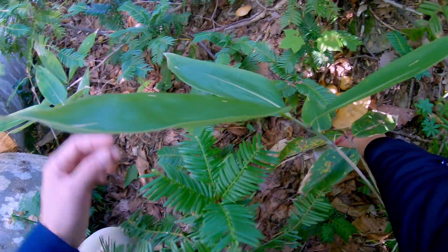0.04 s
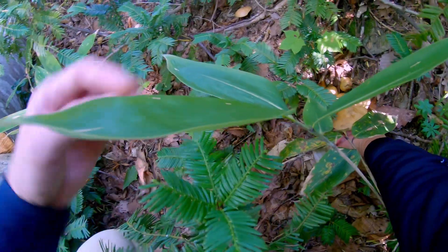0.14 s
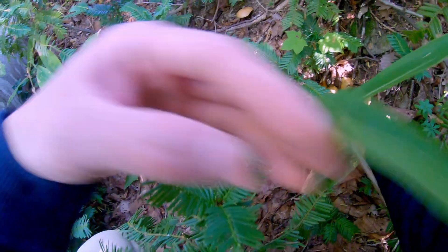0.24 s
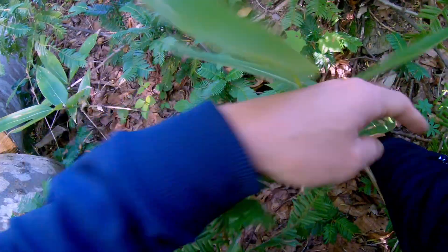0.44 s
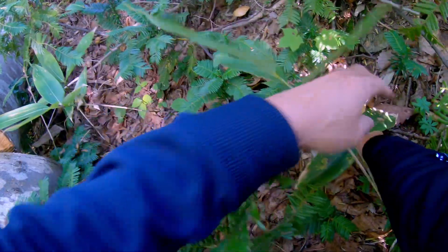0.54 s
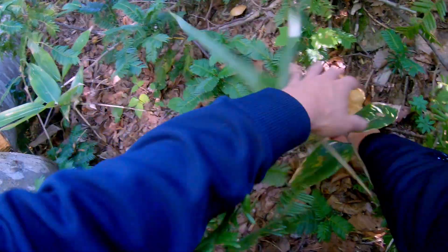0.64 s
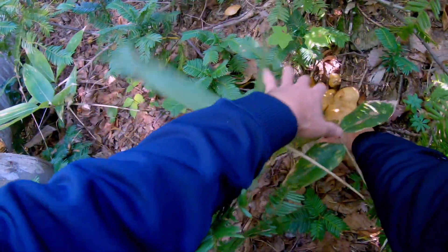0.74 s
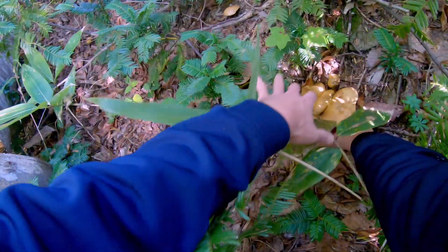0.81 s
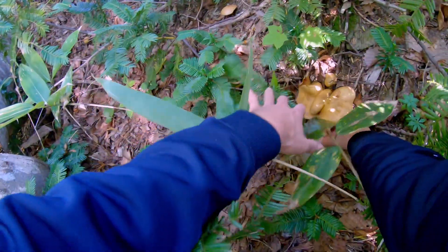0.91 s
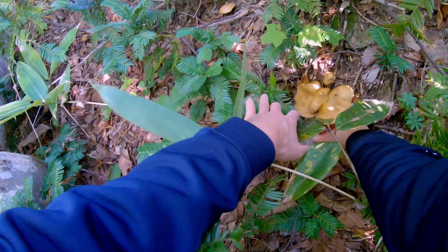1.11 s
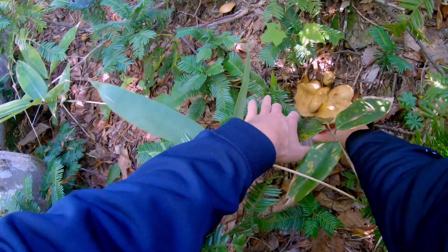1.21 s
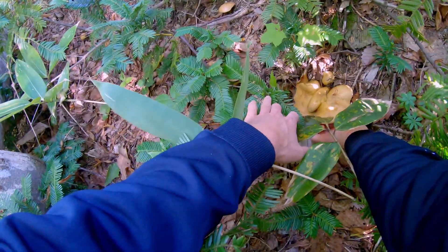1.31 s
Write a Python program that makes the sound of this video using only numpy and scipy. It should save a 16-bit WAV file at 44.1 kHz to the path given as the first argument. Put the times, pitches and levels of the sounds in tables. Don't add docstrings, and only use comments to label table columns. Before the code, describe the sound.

Crackly leaf rustling: a close, rough brush and bumps, followed by quieter snaps in undergrowth.

```python
import sys
import numpy as np
from scipy import signal
from scipy.fft import rfft, irfft, next_fast_len
from scipy.io import wavfile
from scipy.ndimage import uniform_filter1d, map_coordinates

SR = 44100
rng = np.random.default_rng(int(sys.argv[2]) if len(sys.argv) > 2 else 0)


def amplitude_ratio(level_db):
    exponent = np.asarray(level_db, float) / 20
    return 10 ** exponent


def digitize_waveform(pressure):
    field = np.atleast_2d(pressure).T
    bounded = np.clip(field, -1, 1)
    quanta = np.round(bounded * 32767).astype(np.int16)
    wavfile.write(sys.argv[1], SR, quanta)


N = 59535


def unit(x):
    return x / np.sqrt(np.mean(x ** 2) + 1e-20)


def along(points, hz, axis=1):
    rows = np.transpose(points)
    return np.interp(np.log(hz + 1), np.log(rows[0] + 1), rows[axis])


def filtered(x, response):
    m = next_fast_len(x.shape[-1] + 2048)
    return irfft(rfft(x, m) * response(np.fft.rfftfreq(m, 1 / SR)), m)[..., :x.shape[-1]]


def wobble(rate):
    knots = rng.standard_normal(N // 20)
    return unit(map_coordinates(knots, [np.arange(N) * rate / SR]))


def hump(hz, centre_hz, octaves, base_db):
    return amplitude_ratio(base_db) + np.exp(-(np.log2((hz + 1) / centre_hz) / octaves) ** 2)


def crackle(size, rate, spread_db, life_s, smooth, cap_db):
    draw = rng.random((2, size))
    happens = draw[0] < rate / SR
    strength_db = np.minimum(-spread_db * np.log(1 - draw[1]), cap_db)
    ticks = happens * amplitude_ratio(strength_db)
    grains = signal.lfilter([1], [1, -np.exp(-1 / (life_s * SR))], ticks)
    return unit(rng.standard_normal((2, size)) * (smooth + unit(grains)))


def lows(spectrum):
    return unit(filtered(rng.standard_normal((2, N)), lambda f: amplitude_ratio(along(spectrum, f))))


def patchy(x):
    depth_db = 1.3
    z = signal.stft(x, nperseg=128)[2]
    field = uniform_filter1d(rng.standard_normal(z.shape[1:]), size=4, axis=0)
    field = uniform_filter1d(field, size=7, axis=1)
    return signal.istft(z * amplitude_ratio(depth_db * unit(field)), nperseg=128)[1][:, :N]


def even(x):
    z = rfft(x)
    return irfft(z / uniform_filter1d(abs(z), size=60), x.shape[-1])


# (frequency [Hz], level [dB])
PORT_RESPONSE = [(300, -6.5), (1000, -4), (2400, 3.5), (4000, -0.5), (5800, 1), (7200, -1), (9900, 2),
                 (10900, -8.5)]


def port_gain(hz):
    return amplitude_ratio(along(PORT_RESPONSE, hz))


# (frequency [Hz], coherence [0-1], left lead [rad], left over right [dB])
NEAR_PLACE = [(90, .9, 0, -9), (220, .2, 2.5, -8), (600, .92, 3.1, -1), (1400, .8, 2.5, -1),
              (2400, .6, 1.7, -4), (4100, .7, 0, -3), (6900, .45, -2.4, -10), (11000, .15, -3, -13)]
# (frequency [Hz], coherence [0-1], left lead [rad], left over right [dB])
FAR_PLACE = [(330, 0.835, 0.5, -1), (924, 0.019, -1.2, -5), (2470, 0.15, 1.2, -3.5),
             (3820, 0.97, -1.02, -1), (6780, 1, -1.86, -5.5), (8500, 0.23, -4, -7)]


def ports(pair, place):
    def left(hz):
        coherence = np.clip(along(place, hz), 0, 1)
        common = coherence * np.exp(1j * along(place, hz, axis=2))
        unrelated = np.sqrt(1 - coherence ** 2)
        return amplitude_ratio(along(place, hz, axis=3)) * np.array([common, unrelated])
    return np.array([filtered(pair, left).sum(0), pair[0]])


def strokes(rows, levels_db, edge, octaves, base_db, **grain):
    out, effort = np.zeros((2, N)), np.zeros(N)
    for (s, length, peak, hz), db in zip(rows, levels_db):
        start = round(s * SR)
        size = min(round(length * SR), SR // 10)
        peak = np.clip(peak, .02, .98)
        swell = np.interp(np.arange(size) / size, [0, peak, 1], [0, 1, 0]) ** edge
        shape = amplitude_ratio(db) * swell
        sound = crackle(SR // 10, **grain)
        sound = filtered(sound, lambda f: hump(f, hz, octaves, base_db) * port_gain(f))
        out[:, start:][:, :size] += unit(sound[:, :size]) * shape
        effort[start:][:size] += shape
    return out, effort


# (time [s], level [dB])
STIRRING = [(0.0, -51), (0.15, -52.5), (0.202, -58.5), (0.278, -49), (0.39, -48.5), (0.732, -45),
            (0.81, -47.5), (0.868, -52), (0.9, -47.5), (1.066, -49.5), (1.194, -53), (1.35, -55)]
# (frequency [Hz], density [dB per Hz])
MURMUR = [(15, -42), (25, -41), (96, -11.5), (124, -0.5), (248, 13.5), (487, 5.5), (900, 5.5), (1170, -73),
          (1980, -120)]


def bed():
    s, db = np.transpose(STIRRING)
    level_db = np.interp(np.arange(N) / SR, s, db)
    excess_db = level_db - db.mean()
    hiss = crackle(N, rate=400, spread_db=3, life_s=.001, smooth=2.4, cap_db=5)
    hiss = unit(filtered(hiss, lambda f: hump(f, 1955, 0.093, 2.1) * port_gain(f)))
    sheen = filtered(hiss, lambda f: f > 10740)
    hiss = hiss + sheen * (amplitude_ratio(0.5 + 0.35 * excess_db) - 1)
    murmur = amplitude_ratio(-65 + 0.62 * excess_db + 1.5 * wobble(25)) * lows(MURMUR)
    return amplitude_ratio(level_db + 3.5 + 1.1 * wobble(45)) * hiss + murmur


def insects():
    noise = rng.standard_normal((2, N))
    band = filtered(noise, lambda f: hump(f, centre_hz=2500, octaves=0.084, base_db=-60))
    return amplitude_ratio(-59.5) * unit(band)


# (start [s], length [s], peak position [share], centre [Hz])
LITTER_STROKES = [(.015, 0.012, 0.47, 1300), (.505, 0.045, 0.4, 4500), (.635, 0.062, .6, 8500),
                  (.680, 0.071, 0.36, 8800), (.7535, 0.026, 0.28, 9300), (.765, .048, 0.43, 3580),
                  (.820, .02, .15, 8500), (.880, 0.096, .1, 9300), (.890, 0.0628, 0.69, 9400),
                  (.966, 0.0378, 0.15, 3300), (1.0, 0.037, 0.415, 3900), (1.026, 0.031, 0.62, 9240),
                  (1.055, 0.045, 0.34, 9300), (1.100, 0.0211, 0.28, 9200), (1.194, 0.022, .45, 3538),
                  (1.251, .012, 0.086, 3440), (1.272, 0.021, 0.29, 2500), (.94, 0.062, 0.29, 9900),
                  (.995, 0.031, 0.49, 9600), (.754, 0.023, 0.22, 2150), (.596, 0.019, 0.37, 8300),
                  (.900, 0.049, 0.78, 4200), (.544, 0.0093, 0.56, 5050)]
LITTER_LEVELS = [-43.5, -52.5, -41, -35, -35, -42.5, -66, -55, -42.5, -48, -46, -47.5, -47.5, -46.5, -50.5,
                 -42.5, -50.5, -48, -37, -43, -55, -44.5, -47]


def scrapes():
    return strokes(LITTER_STROKES, LITTER_LEVELS, edge=.6, octaves=1.0, base_db=-10.5,
                   rate=3000, spread_db=4, life_s=.0004, smooth=1.6, cap_db=11)


# (frequency [Hz], level [dB])
LITTER_CRISPNESS = [(10500, 0.5), (11500, 1.5)]


def crisp(scrape):
    return filtered(scrape, lambda f: amplitude_ratio(along(LITTER_CRISPNESS, f)))


# (frequency [Hz], density [dB per Hz])
GROUND_THUD = [(40, -28), (110, -29), (250, 2), (450, 1.5), (800, -11), (1200, -54.5)]


def thuds(effort):
    return amplitude_ratio(-23.0) * uniform_filter1d(effort, size=600) * lows(GROUND_THUD)


# (time [s], peak level [dB], pitch [Hz])
SNAP_EVENTS = [(0.0205, -57, 1680), (0.0487, -39, 2430), (0.2085, -15.5, 5600), (0.235, -20.5, 4100),
               (0.2749, -11, 2600), (0.3851, -17.5, 1978), (0.4341, -23.5, 11200), (0.4806, -22, 4800),
               (0.5486, -31.5, 5400), (0.5998, -30, 8360), (0.6340, -41, 9100), (0.715, -32, 2000),
               (0.758, -24, 9726), (0.7599, -23, 3070), (0.778, -22.5, 3270), (0.798, -31, 3400),
               (0.8215, -31, 8000), (0.8614, -31.5, 8200), (0.8663, -31, 4600), (0.881, -35.5, 3270),
               (0.917, -27.5, 7600), (0.9723, -30.5, 2600), (0.9772, -30, 3200), (0.9886, -32, 3200),
               (1.0932, -34.5, 6000), (1.1556, -39.5, 5000), (1.2001, -36, 3060), (1.2421, -27.5, 3130),
               (1.2493, -25.5, 3220), (1.2642, -37, 2230), (1.3019, -33, 2690)]
# (frequency [Hz], level [dB])
SNAP_TREBLE = [(10500, 0), (12500, -7)]


def snaps():
    rise_s, crack_t60_s, tail_t60_s, lag_s = .0003, .007, .03, .0007
    out, t = np.zeros((2, N + SR)), np.arange(SR // 20) / SR
    for s, db, hz in SNAP_EVENTS:
        def colour(f):
            treble = amplitude_ratio(along(SNAP_TREBLE, f))
            return hump(f, hz, octaves=.3, base_db=-2) * port_gain(f) * treble * (f > 1400)
        noise = rng.standard_normal((4, len(t)))
        burst = noise[:2] * amplitude_ratio(-60 * t / crack_t60_s) * np.minimum(t / rise_s, 1)
        crack = filtered(even(burst), colour)
        crack = crack / abs(crack).max(1, keepdims=True)
        scatter = amplitude_ratio(-22 - 60 * t / tail_t60_s) * unit(filtered(noise[2:], colour))
        place = NEAR_PLACE if .2 < s < .5 else FAR_PLACE
        start = round((s + lag_s) * SR)
        out[:, start:][:, :len(t)] += amplitude_ratio(db + 6) * ports(crack + scatter, place)
    return out[:, :N]


# (start [s], length [s], pitch [Hz], level [dB])
STEM_CREAKS = [(0.039, 0.053, 70, -72), (0.659, 0.058, 59.4, -68), (0.554, 0.12, 391, -64.5),
               (.685, 0.071, 181.4, -63), (0.727, .1, 242.7, -56.5), (.74, 0.049, 505, -55.5),
               (.85, 0.15, 93, -66), (.955, .07, 165, -61.5), (0.957, 0.043, 340, -58.5),
               (0.983, 0.064, 388, -57.5), (1.021, 0.083, 253, -62.5), (1.166, .12, 94.5, -63.5),
               (1.172, 0.065, 292, -62), (1.235, 0.049, 246.4, -60)]


def creaks():
    out, t = np.zeros((2, N)), np.arange(SR // 6) / SR
    for s, length, hz, db in STEM_CREAKS:
        start = round(s * SR)
        drift = .02 * np.cumsum(rng.standard_normal((2, len(t))), 1)
        swell = np.sin(np.pi * np.clip(t / length, 0, 1))
        creak = amplitude_ratio(db) * swell * np.sin(2 * np.pi * hz * t + drift)
        out[:, start:][:, :len(t)] += creak[:, :N - start]
    return out


# (start [s], length [s], peak position [share], centre [Hz])
EDGE_SQUEAKS = [(.374, 0.03064, 0.41, 1889), (.410, 0.014, 0.32, 2220), (.415, 0.022, 0.25, 3230),
                (.318, 0.045, 0.15, 5780), (0.37, 0.023, 0.69, 6300), (.450, 0.021, 0.68, 3640),
                (.275, 0.006, 0.067, 2660), (.296, 0.0066, 0.27, 5130), (0.4, 0.02457, .5, 10000),
                (0.4, 0.022, 0.67, 1290), (.210, 0.00995, 0.21, 2700), (0.2, 0.0099, 0.26, 4100)]
EDGE_LEVELS = [-31, -42.5, -38, -27, -35.5, -35, -28, -32, -52.5, -32.5, -36.5, -39]


def squeaks():
    squeak, _ = strokes(EDGE_SQUEAKS, EDGE_LEVELS, edge=.7, octaves=.2, base_db=-28,
                        rate=900, spread_db=3, life_s=.0015, smooth=.8, cap_db=9)
    return squeak


# (start [s], length [s], peak position [share], centre [Hz])
LEAF_DRAGS = [
    (.2085, 0.02, 0.046, 5500),
    (.226, 0.025, 0.44, 4000),
    (.2495, .027, 0.288, 7240),
    (.275, .019, .1, 8200),
    (.292, 0.025, 0.38, 6700),
    (.311, 0.036, 0.16, 7400),
    (.335, 0.038, 0.54, 7450),
    (.366, 0.045, 0.48, 8400),
    (.406, 0.041, 0.2, 8700),
    (.438, 0.033, 0.507, 4230),
]
LEAF_LEVELS = [-32.5, -33.5, -25.5, -23.5, -25, -26.5, -23.5, -29, -33.5, -36]


def drags():
    return strokes(LEAF_DRAGS, LEAF_LEVELS, edge=.5, octaves=0.86, base_db=0.5,
                   rate=3500, spread_db=3.5, life_s=.0004, smooth=1.8, cap_db=10)


# (frequency [Hz], density [dB per Hz])
LEAF_RUB = [(25, -3), (50, -14), (100, -7.5), (300, 2.5), (800, 3.5), (1400, 0.5), (2200, -30)]


def rubs(effort):
    return amplitude_ratio(-5.5) * uniform_filter1d(effort, size=300) * lows(LEAF_RUB)


# (time [s], level [dB], pitch [Hz], t60 [s])
HOUSING_BUMPS = [(0.257, -28, 494, 0.11), (0.286, -38, 400, 0.063), (0.31, -32, 65, 0.23),
                 (0.29, -30.5, 105, 0.2), (.316, -19.5, 682, 0.037), (0.348, -16.5, 890, 0.035),
                 (0.355, -12.5, 224, 0.025), (0.364, -17.5, 90, 0.029), (.428, -28.5, 1000, 0.056),
                 (0.42, -35.5, 320, 0.13), (0.44, -22.5, 236, 0.0287), (0.37, -21, 390, 0.057),
                 (0.48, -45, 62, 0.093), (0.5, -40.5, 170, 0.049)]


def bumps():
    out, t = np.zeros((2, N)), np.arange(SR // 8) / SR
    onset = 1 - np.exp(-t / 0.00083)
    for s, db, hz, t60 in HOUSING_BUMPS:
        drift = .015 * np.cumsum(rng.standard_normal((2, len(t))), 1) + [[0], [1.5]]
        knock = amplitude_ratio(db - 60 * t / t60) * np.sin(2 * np.pi * hz * t + drift) * onset
        out[:, round(s * SR):][:, :len(t)] += knock
    return out


def scene():
    drag, leaf_effort = drags()
    squeak = squeaks()
    scrape, hand_effort = scrapes()
    rub = rubs(leaf_effort)
    thud = thuds(hand_effort)
    near = amplitude_ratio(4.0) * patchy(drag) + amplitude_ratio(4.0) * squeak + bumps() + rub
    far = amplitude_ratio(5.0) * crisp(patchy(scrape)) + thud + bed() + insects() + creaks()
    return ports(near, NEAR_PLACE) + ports(far, FAR_PLACE) + snaps()


def band_limit(x):
    return signal.sosfilt(signal.butter(12, 15700, fs=SR, output="sos"), x)


# (frequency [Hz], level [dB])
TREBLE_ROLL_OFF = [(11000, -2.5), (13000, -13.5), (14600, -9.5), (15400, -52)]


def record(dry):
    mix = filtered(dry, lambda f: amplitude_ratio(along(TREBLE_ROLL_OFF, f)))
    return band_limit(mix)


dry = scene()
out = record(dry)
digitize_waveform(out)
```